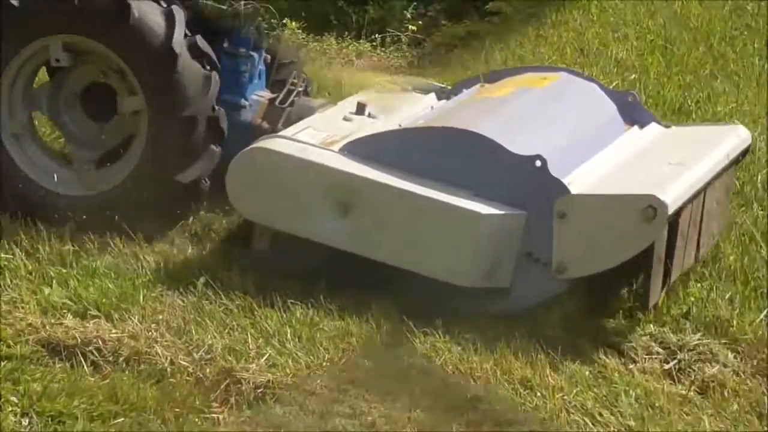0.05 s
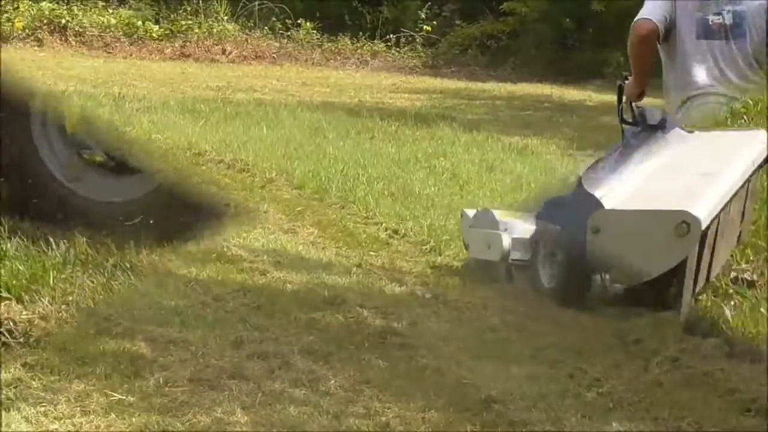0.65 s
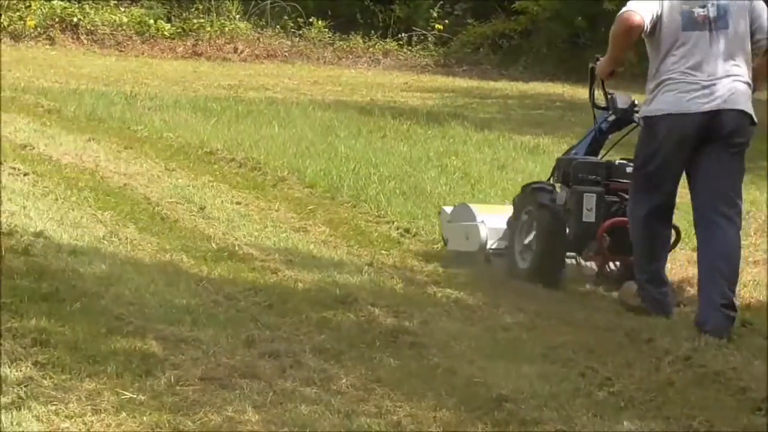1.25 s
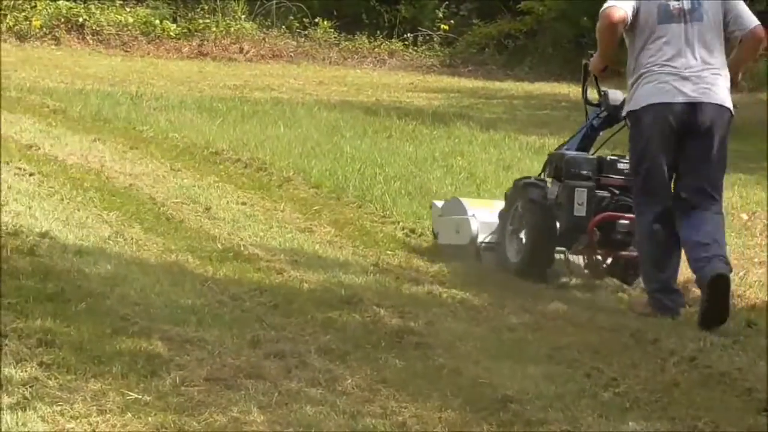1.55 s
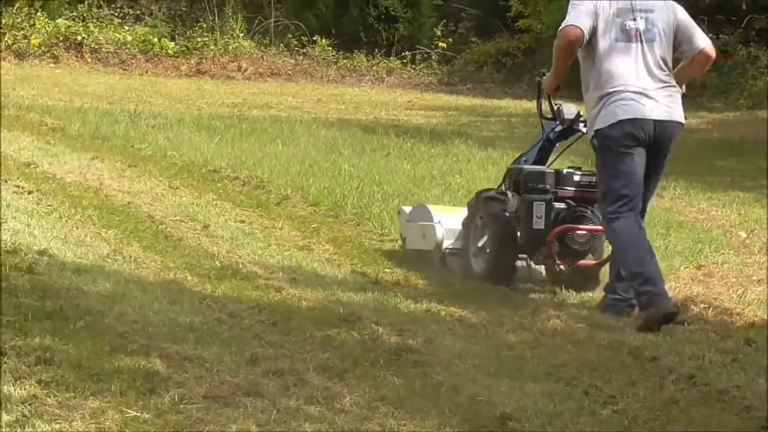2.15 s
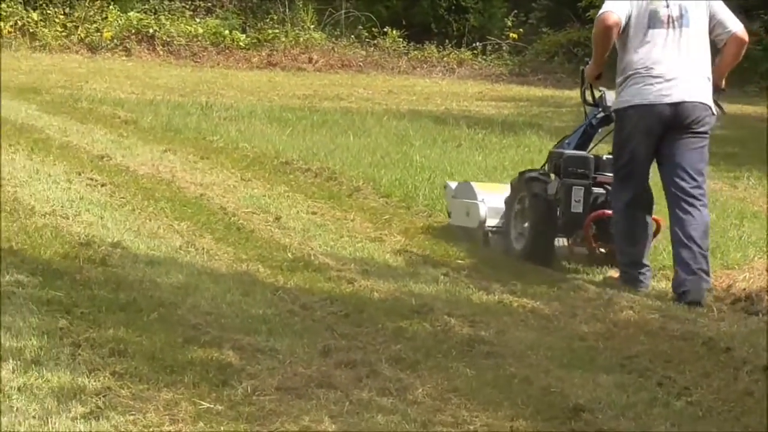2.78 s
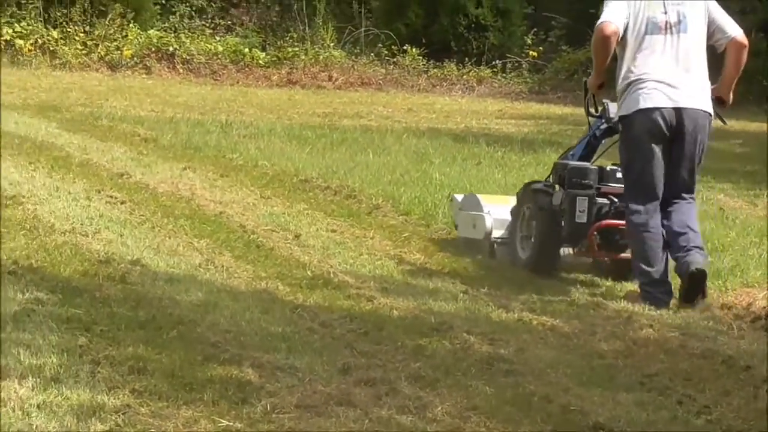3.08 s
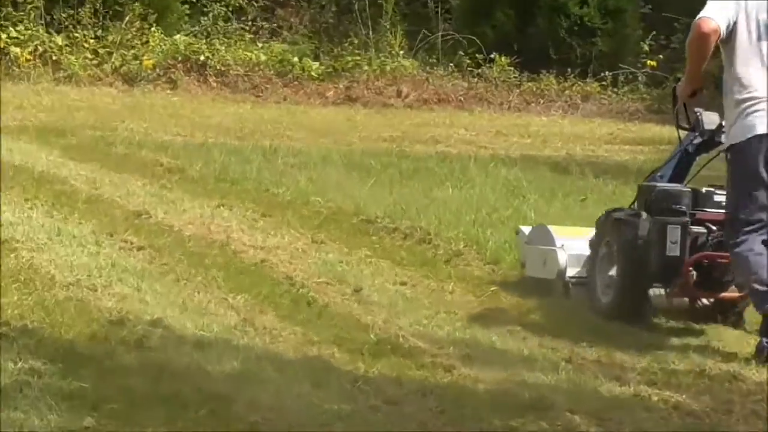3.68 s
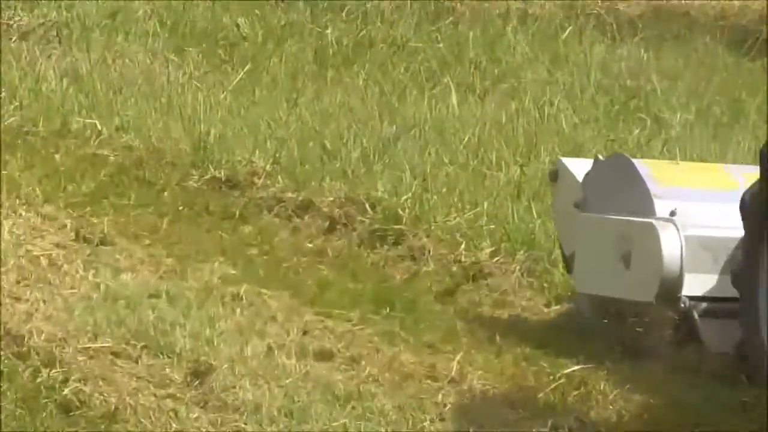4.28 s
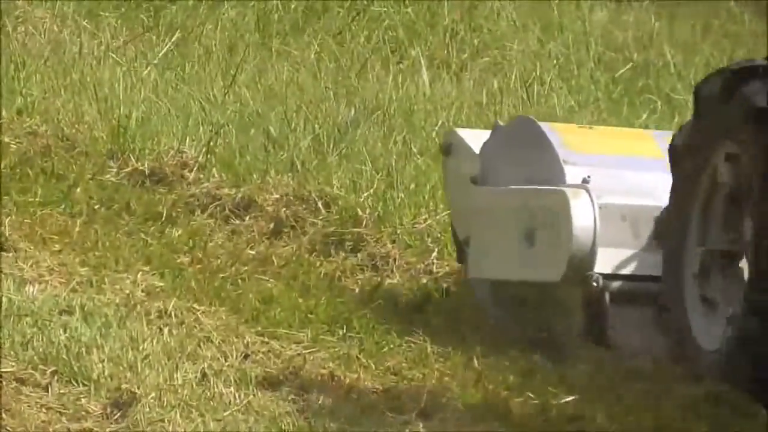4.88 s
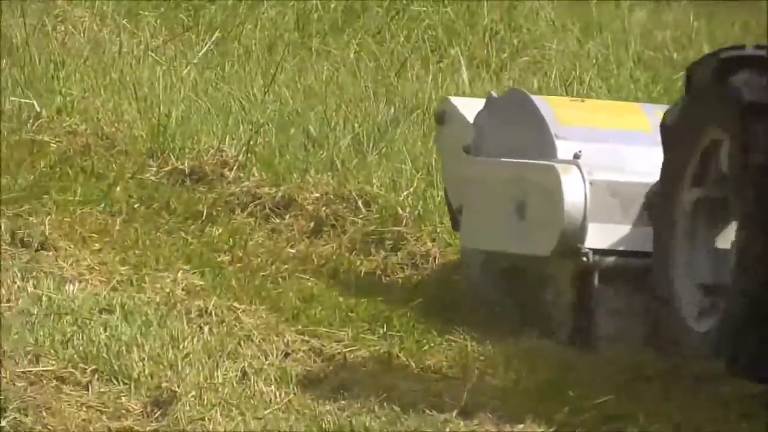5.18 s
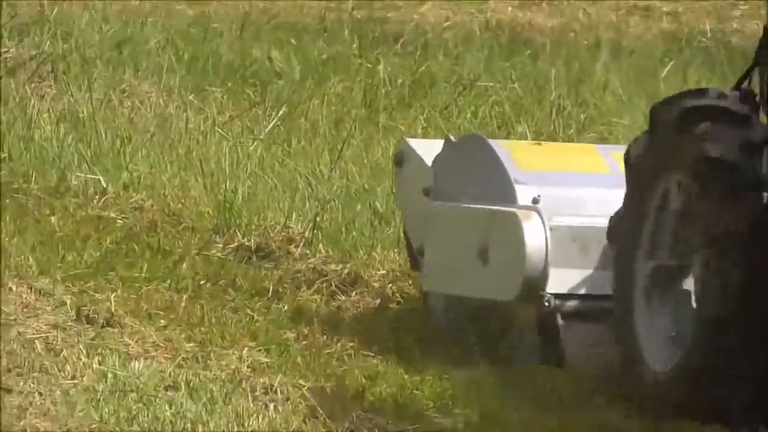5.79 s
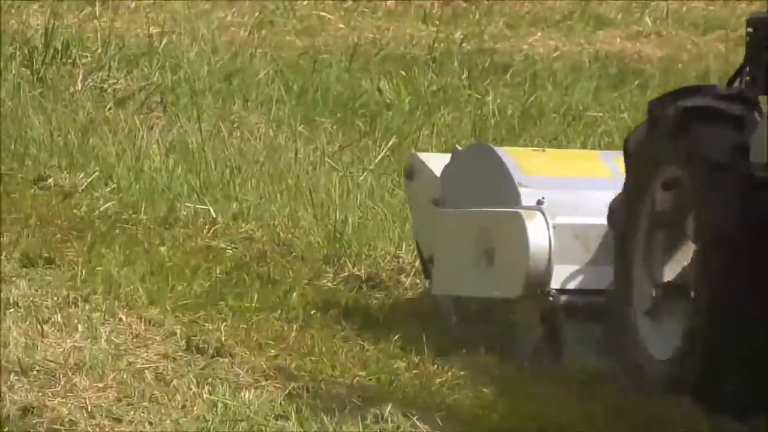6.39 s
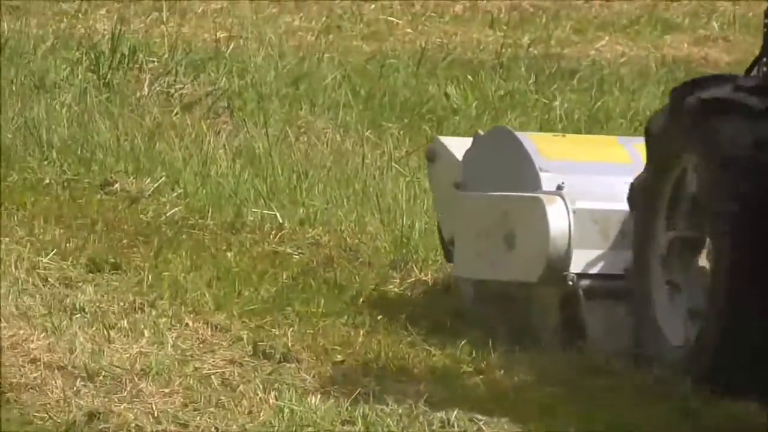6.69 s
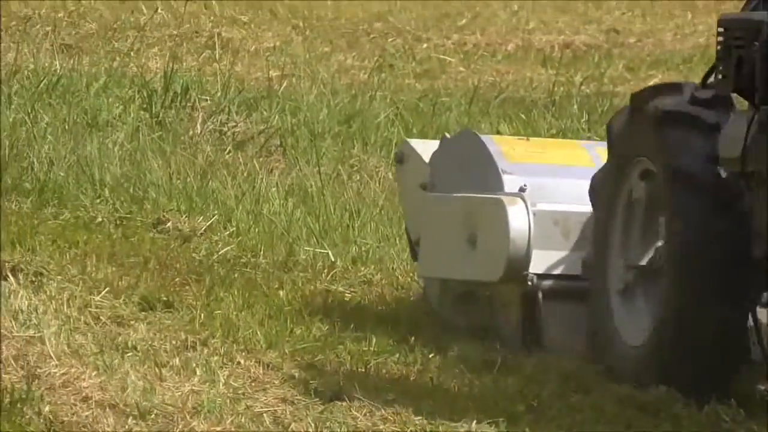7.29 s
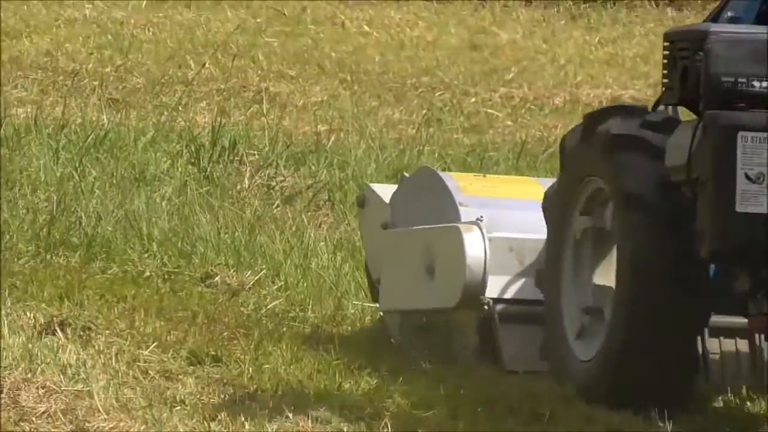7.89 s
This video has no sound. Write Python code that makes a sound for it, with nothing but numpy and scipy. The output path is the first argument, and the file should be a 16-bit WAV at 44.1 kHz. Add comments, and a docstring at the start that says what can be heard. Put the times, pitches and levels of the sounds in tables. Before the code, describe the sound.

A walk-behind tractor drives a flail mower across a lawn. For about the first second the blades roar in the grass right beside the microphone, then that close sound cuts off. The machine carries on from behind, its single-cylinder engine thudding rapidly and throbbing against the rotor's hum. Metal clatters, a loose shield rattles now and then, and cut grass fizzes as it all slowly grows fainter.

```python
"""A walk-behind tractor with a single-cylinder engine drives a flail mower slowly away over a lawn.
Its exhaust thuds thirty times a second and throbs against the hum of the rotor that swings the blades.
Blows inside the engine ring its metal, a loose muffler shield rattles, and cut grass churns and fizzes.
At first the machine is also heard from close beside the mower hood; that sound cuts off after 1.2 s."""
import sys
import numpy as np
from scipy import signal
from scipy.fft import rfft, irfft, next_fast_len
from scipy.io import wavfile

SR = 44100
rng = np.random.default_rng(int(sys.argv[2]) if len(sys.argv) > 2 else 0)


def wav_record(signal):
    """Record a signal, one row per channel, as 16-bit PCM in the file named by sys.argv[1]."""
    frames = np.transpose(np.atleast_2d(signal))
    bounded = np.clip(frames, -1, 1)
    # unit amplitude maps onto the largest positive 16-bit level
    quanta = np.round(bounded * 32767).astype(np.int16)
    wavfile.write(sys.argv[1], SR, quanta)


N = 355005
TIME = np.arange(N) / SR
FIRST_FIRING = .673  # in cycles; one engine cycle runs from one firing to the next

# blows of the moving engine parts: place/cycles, length/cycles, level/dB
KNOCKS = [(.6, 0.1025, -1.5), (.82, 0.0792, -4), (.15, 0.0702, -1.5), (.35, 0.0573, -4), (.45, 0.047, -2)]
# tone of exhaust gas and cut grass: f/Hz, level/dB
HISS = [(100, -45), (1500, -16.5), (3000, -5.5), (3600, 1), (5200, -2), (7000, -7.5), (8500, -5),
        (9500, -5), (11500, -2.5), (13000, -7.5), (15000, -23)]


def tractor():
    """The whole machine from behind; as it rolls away, each of its sounds fades at its own pace."""
    # the engine slows in thick grass and recovers: t/s, firing rate/Hz
    speed = [(0.0, 30.272), (0.25, 30.168), (0.7, 30.318), (1.1, 30.221), (1.65, 29.804), (2.06, 29.992),
             (2.41, 29.682), (4.32, 30.029), (5.03, 29.727), (5.43, 29.968), (5.78, 30.017), (7.09, 29.817),
             (7.55, 30.149), (8.05, 30.084)]
    # the treble rises and falls a little: t/s, level/dB
    treble_levels = [(1.3, 0.5), (1.65, 1.2), (2.3, 0.5), (3.5, -0.77), (5.05, 0.34), (6.9, 0.1),
                     (7.55, -1.4), (8.05, -1.1)]
    cycles = np.cumsum(over_time(speed)) / SR
    treble = amp(over_time(treble_levels))
    metal_gain = treble * rolling_away(loss_db=1.93)
    fizz_gain = treble * rolling_away(loss_db=4)
    hum = rolling_away(loss_db=3) * (amp(-24.5) * exhaust(cycles) + amp(4.5) * rotor(cycles))
    whirr = metal_gain * amp(2) * engine_block(cycles)
    rush = rolling_away(loss_db=6) * amp(-25.5) * clippings(cycles)
    knocks = metal_gain * amp(-32) * clatter(cycles)
    fizz = fizz_gain * (amp(-35.5) * hiss(cycles) + amp(-43.5) * stalks(cycles))
    return hum + lawn_bounce(whirr + rush + knocks) + fizz + shield_rattles(cycles)


def exhaust(cycles):
    """Each firing pushes one low thud out of the muffler."""
    # tones of the thud: multiple of the firing rate, level/dB
    tones = [(2, -49.5), (3, -69), (4, -35.5), (5, -29.5), (6, -34), (7, -35.5), (8, -35.5), (9, -38.5),
             (11, -41.5)]
    thuds = -sum(amp(db) * np.cos(2 * np.pi * k * (cycles - FIRST_FIRING)) for k, db in tones)
    return unit_level(thuds)


def rotor(cycles, turns_per_firing=1.5885):
    """The blades hum just above the engine's sixth harmonic, so the two throb; drive and fan whine."""
    # hum of four rows of blades: multiple of the turning rate, level/dB
    blade_tones = [(2, -52.5), (3, -53), (4, -29), (6, -60), (8, -40.5), (9, -66), (10, -58), (11, -59),
                   (18, -48), (54, -52)]
    # rough whine of the drive and the cooling fan's high tones: multiple of the firing rate, level/dB
    whine_tones = [(13.3, -42.5), (15.3, -44.5), (88, -53), (89, -59.5), (110, -52.5)]
    turns = cycles * turns_per_firing + .026
    blades = wavering_tones(turns, blade_tones, waver=.096, smear_rad=.1)
    jitter = .0022 * drift(25)  # play in the gears roughens the high whine
    return blades + wavering_tones(cycles + jitter, whine_tones, waver=.066, smear_rad=.75)


def engine_block(cycles, throb=.18):
    """The engine case and cooling fan whirr, pulsing with the blows and swelling at each firing."""
    # the case and the eleven-blade fan: multiple of the firing rate, level/dB
    tones = [(13, -52.5), (14, -44), (15, -43), (17, -57), (18, -57.5), (20, -49.5), (21, -50), (22, -40.5),
             (24, -51), (29, -51.5), (32, -53.5), (33, -45.5), (35, -48.5), (37, -52), (38, -51),
             (39, -46.5), (40, -59), (42, -53), (43, -50), (44, -36), (45, -45.5), (46, -40), (48, -43),
             (49, -52.5), (51, -47.5), (52, -52.5), (66, -46), (68, -46), (72, -46)]
    place, length, db = np.transpose(KNOCKS)
    blows = amp(db) * np.exp(2j * np.pi * rng.random(len(KNOCKS)))

    def phase(k):
        """Lines up tone k with the blows."""
        return np.angle(np.sum(blows * np.exp(-2j * np.pi * k * (place + length / 2))))

    whirr = wavering_tones(cycles + .0021 * drift(15), tones, waver=.19, smear_rad=.51, phase=phase)
    swell = 1 + throb * np.cos(2 * np.pi * (cycles - FIRST_FIRING))
    return whirr * swell * amp(1.8 * drift(22))


def clatter(cycles, repeat_gain=.29):
    """Piston and valve blows ring the metal; part of each blow is the same in every cycle."""
    # tone of the clatter: f/Hz, level/dB
    spectrum = [(60, -46), (300, -23.5), (700, -14.5), (1100, -3.5), (1400, 3), (1700, -4), (2400, -8.5),
                (2950, -10.5), (3300, -4.5), (4500, -10.5), (7000, -24), (15000, -38.5)]
    # where the engine metal rings: f/Hz, width/Hz, boost/dB
    resonances = [(1034, 40, 9.5), (1128, 58, 10), (1257, 106, 8.5), (2090, 390, 8.2), (2615, 230, 5.2)]
    pattern = rng.standard_normal(1470)
    noise = rng.standard_normal((2, N))
    noise[0] += repeat_gain * pattern[(cycles % 1 * len(pattern)).astype(int)]
    power = .5 + pulses(cycles + .0535, KNOCKS, uneven_db=2)
    return shape_noise(noise * np.sqrt(power), spectrum, resonances)


def beside_hood(firing_hz=30.62, end_s=1.232, ease_db_per_s=.8):
    """Close by, the roar of the blades in the grass covers much of the engine, then both cut off."""
    # engine tones beside the hood: multiple of the firing rate, level/dB
    tones = [(2, -44), (4, -38.5), (5, -50), (6, -56), (7, -23.8), (8, -54), (9, -44), (11, -41.5),
             (14, -60), (17, -42), (22, -36), (42, -58), (43, -36.5), (44, -42), (46, -52)]
    # tone of the roar: f/Hz, level/dB
    spectrum = [(25, -34), (90, -21), (170, 3.5), (300, -8), (500, 3), (700, -0.5), (950, -5.5),
                (1300, -1.5), (1700, -13.5), (2900, -16), (3500, -12.5), (8000, -23), (11500, -20),
                (15000, -34)]
    # where the hood rings: f/Hz, width/Hz, boost/dB
    resonances = [(1290, 150, 5), (2006, 100, 9), (2618, 54, 12.5), (3310, 110, 4.5), (4470, 47, 10.5),
                  (5400, 100, 6), (5800, 130, 6.5), (6350, 170, 7.5)]
    cycles = firing_hz * TIME - .226
    engine = -wavering_tones(cycles - FIRST_FIRING, tones, waver=.15, smear_rad=.15)
    hum = engine + amp(-14) * rotor(cycles)
    churn = rng.standard_normal((2, N)) * np.sqrt(4 + pulses(cycles, [(.58, .11, -3.5)], uneven_db=1))
    roar = amp(-23 - ease_db_per_s * TIME) * shape_noise(churn, spectrum, resonances)
    return (hum + roar) * np.clip((end_s - TIME) / .0035, 0, 1)


def clippings(cycles):
    """Air and clippings churn under the hood, with a small surge in each engine cycle."""
    # tone of the churning: f/Hz, level/dB
    spectrum = [(20, -28), (55, -24), (80, -17), (100, -19.5), (150, -9.5), (195, -2.5), (280, -8),
                (390, -0.5), (490, 0), (570, -5.5), (690, -10), (850, -1.5), (1000, -14.5), (4000, -36.5)]
    churn = rng.standard_normal((2, N)) * np.sqrt(6 + pulses(cycles, [(.52, .055, 0)], uneven_db=5))
    return shape_noise(churn, spectrum)


def hiss(cycles):
    """Sharp puffs of gas stand out over the steady fizz of the blades."""
    # exhaust crack, its tail and the air intake: place/cycles, length/cycles, level/dB
    puffs = [(.58, 0.046, 1), (0.65, 0.26, -1.5), (0.8, .045, 6)]
    # where the thin sheet of hood and muffler shield rings: f/Hz, width/Hz, boost/dB
    resonances = [(4230, 64, 5), (5210, 110, 3.5), (7540, 200, 4), (8550, 140, 1.5)]
    power = 3 + pulses(cycles, puffs, uneven_db=3.5)
    noise = rng.standard_normal((2, N)) * np.sqrt(power) * amp(.5 * drift(25))
    return shape_noise(noise, HISS, resonances)


def shield_rattles(cycles, chatter_share=.3, contacts=4, contact_db=-8, detune=.04):
    """Firings jolt the loose muffler shield, a few hard and many lightly; quick contacts ring it."""
    # hard jolts: t/s, strength/dB
    hard_jolts = [(1.443, -29), (1.577, -24), (1.645, -27), (1.711, -30), (2.448, -25), (2.548, -27),
                  (2.614, -27), (2.886, -26), (4.456, -31), (7.232, -31)]
    # ringing tones of the shield: f/Hz, level/dB, decay/s
    modes = [(3680, -4, 0.0015), (4620, 5, .0018), (5380, 2, 0.0023), (6300, -22, 0.0014), (7450, -5, .002),
             (8850, -10, .002), (11200, 1, .001)]
    jolt_times = TIME[1:][np.diff(np.floor(cycles - .55)) > 0]  # one chance in each cycle
    chances, strengths_db = rng.random(300), rng.normal(-32.5, .5, 300)
    light_jolts = [(start, db) for start, chance, db in zip(jolt_times, chances, strengths_db)
                   if chance < chatter_share]
    out = np.zeros(N)
    t = np.arange(SR // 30) / SR
    for start, db in hard_jolts + light_jolts:
        for delay in rng.uniform(0, .0031, contacts):
            pitch = 1 + detune * rng.uniform(-1, 1)  # each contact lands elsewhere on the sheet
            ring = 0
            for hz, mode_db, decay in modes:
                gain = amp(mode_db) * rng.uniform(.44, 1.14)
                ring += gain * np.sin(2 * np.pi * hz * pitch * t) * np.exp(-t / decay)
            part = out[round((start + delay) * SR):][:len(t)]
            part += amp(db + contact_db) * ring[:len(part)]
    return out


def stalks(cycles, snaps_per_s=800, ring_s=.0012, size_db=4.5, pitches=24):
    """Stalks snap on the blades with tiny pitched clicks, more often as a firing jerks the rotor."""
    t = np.arange(SR // 40) / SR
    chance = .4 + pulses(cycles, [(.58, .12, 3)], uneven_db=2)
    chance *= snaps_per_s / pitches / SR / chance.mean()
    out = np.zeros((2, N))
    for hz in np.geomspace(3400, 12500, pitches):
        hits = np.flatnonzero(rng.random(N) < chance)
        size = np.minimum(rng.exponential(1, len(hits)), 3)
        pan = rng.uniform(-.3, 1.87, len(hits))
        clicks = np.zeros((2, N))
        clicks[:, hits] = amp(size_db * size) * np.array([np.cos(pan), np.sin(pan)])
        snap = np.sin(2 * np.pi * hz * t) * np.exp(-t / (ring_s * rng.uniform(.45, 2)))
        snap *= amp(level_at(HISS, hz)) * np.sqrt(hz)
        out += signal.oaconvolve(clicks, snap[None], axes=1)[:, :N]
    return unit_level(out)


def lawn_bounce(sound, width_hz=370, depth=.47):
    """Sound bouncing off the soft lawn partly cancels one band of the direct sound."""
    # the weakened band sinks with distance: t/s, f/Hz
    dip = [(0, 860), (2.3, 776), (4, 675), (6, 654), (8.05, 580)]
    carrier = np.exp(2j * np.pi * np.cumsum(over_time(dip)) / SR)
    pole = np.exp(-np.pi * width_hz / SR)
    band = 2 * (carrier * signal.lfilter([1 - pole], [1, -pole], sound / carrier)).real
    return sound - depth * band


def rolling_away(loss_db, start_m=3.13, walk_m_per_s=.57):
    """A gain that drops by loss_db each time the distance doubles, and sways as the grass changes."""
    doublings = np.log2(1 + walk_m_per_s * TIME / start_m)
    return amp(-loss_db * doublings + .65 * drift(.5))


def wavering_tones(turns, tones, waver, smear_rad, phase=lambda k: 0):
    """Tones of a spinning shaft; each wavers in level and phase as the machine rolls along."""
    drifts = [drift(1.2) for _ in range(6)]
    out = np.zeros(N)
    for k, db in tones:
        swell, shift = (drifts[i] for i in rng.permutation(len(drifts))[:2])
        angle = 2 * np.pi * k * turns + phase(k) + smear_rad * shift
        out += amp(db) * (1 + waver * swell) * np.cos(angle)
    return out


def pulses(cycles, blows, uneven_db):
    """Power of blows that return every cycle: a quick rise, a slower fall, each with its own strength."""
    power = 0
    for place, length, db in blows:
        cycle, age = np.divmod(cycles - place + 2, 1)
        strength = amp(db + uneven_db * rng.uniform(-1.7, 1.7, 300))[cycle.astype(int)]
        power += strength ** 2 * 2 * (1 - np.exp(-10 * age / length)) * np.exp(-age / length)
    return power


def shape_noise(noise, spectrum, resonances=()):
    """Gives two noises a tone and a ring: mid goes to both ears, side spreads it left and right."""
    # stereo width: f/Hz, side level against mid/dB
    stereo_width = [(30, 0), (150, -9), (500, -16), (1300, -14), (2200, -11.5), (4500, -11), (8500, -3.5),
                    (13000, -6)]
    size = next_fast_len(N + 4096, True)
    hz = np.fft.rfftfreq(size, 1 / SR)
    peaks_db = sum(boost / (1 + (2 * (hz - f) / width) ** 2) for f, width, boost in resonances)
    cepstrum = irfft(np.log(amp(level_at(spectrum, hz) + peaks_db)), size)
    cepstrum[1:size // 2] *= 2  # folded so that the ringing comes after each blow, never before
    cepstrum[size // 2 + 1:] = 0
    shaped = rfft(noise, size) * np.exp(rfft(cepstrum))
    mid = irfft(shaped[0], size)[:N]
    side = irfft(shaped[1] * amp(level_at(stereo_width, hz)), size)[:N]
    return np.array([mid + side, mid - side]) / np.std(mid)


def drift(rate_hz):
    """A smooth random wobble of typical size 1, up to about the given rate."""
    points, points_per_s = 4096, 400
    hz = np.fft.rfftfreq(points, 1 / points_per_s)
    slow = irfft(rfft(rng.standard_normal(points)) / (1 + (hz / rate_hz) ** 4))
    return np.interp(TIME * points_per_s, np.arange(points), unit_level(slow))


def over_time(rows):
    """Joins (time, value) points with straight lines."""
    return np.interp(TIME, *np.transpose(rows))


def level_at(spectrum, hz):
    """Looks up a level in dB between the points of a spectrum, on a log-frequency scale."""
    f, db = np.transpose(spectrum)
    return np.interp(np.log(hz + 1), np.log(f + 1), db)


def amp(db):
    """Turns decibels into a gain."""
    return 10 ** (np.asarray(db) / 20)


def unit_level(x):
    """Scales a signal to an average (rms) level of 1."""
    return x / np.sqrt(np.mean(x ** 2) + 1e-20)


def scene():
    """The machine from behind and from beside the hood, slightly right of centre."""
    return (tractor() + beside_hood()) * amp([[-.4], [.4]])


def record(dry, cutoff_hz=15100):
    """Cuts off the very highest treble."""
    lowpass = signal.firwin(511, cutoff_hz, window=("kaiser", 9), fs=SR)
    return signal.oaconvolve(dry, lowpass[None], "same")


dry = scene()
out = record(dry)
wav_record(out)
```